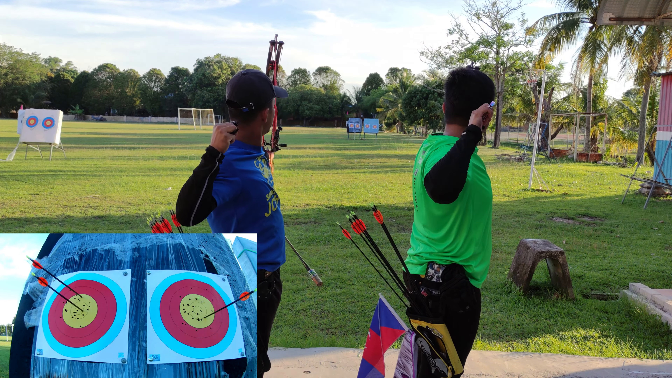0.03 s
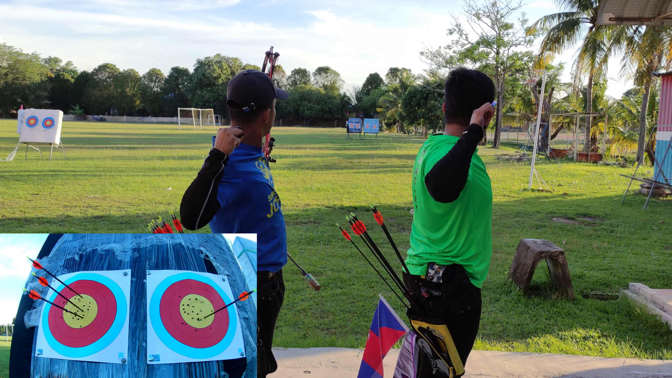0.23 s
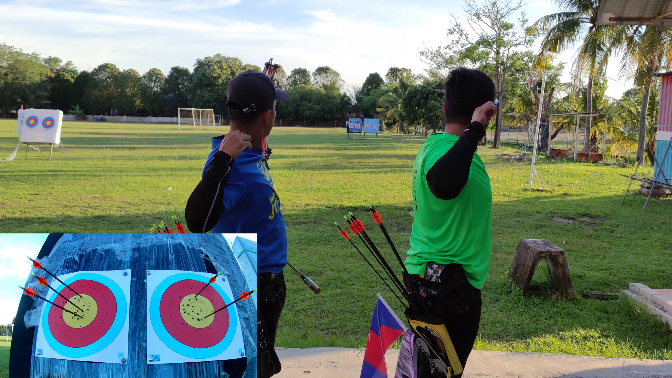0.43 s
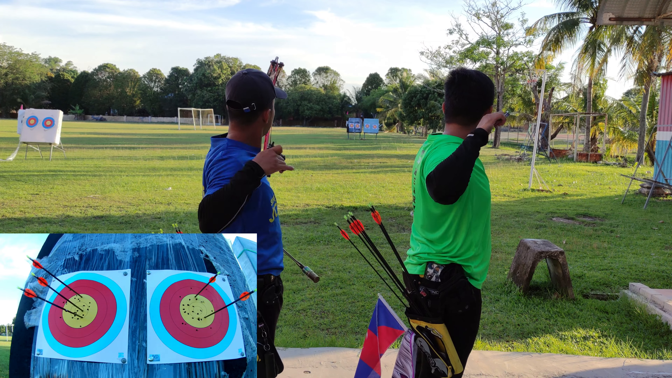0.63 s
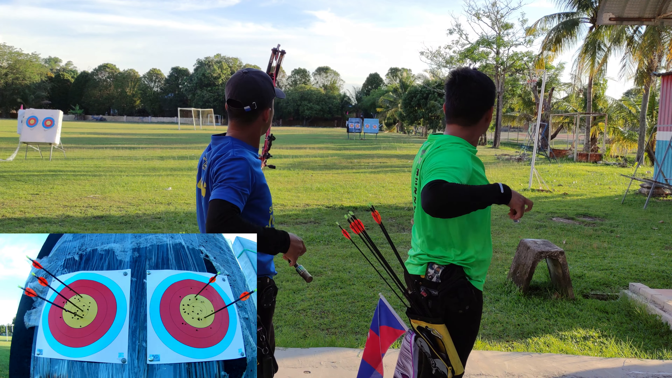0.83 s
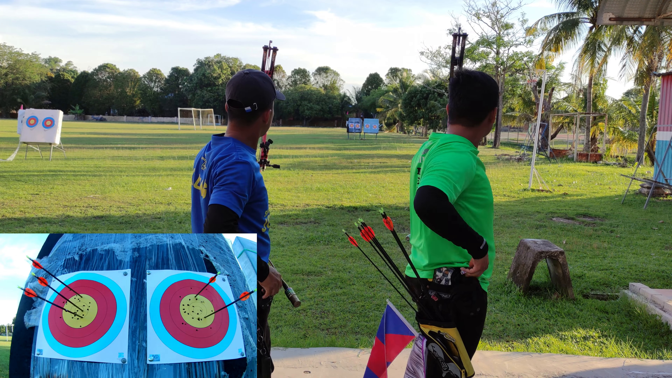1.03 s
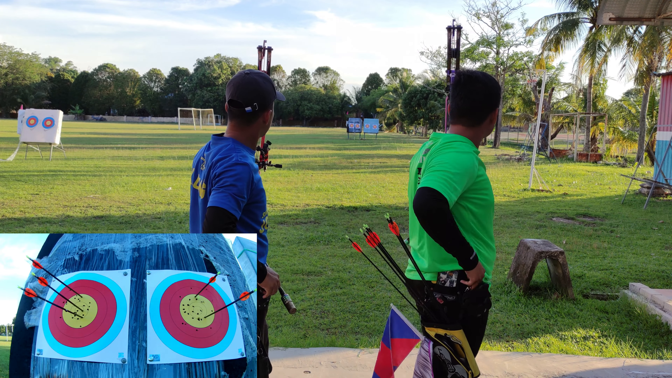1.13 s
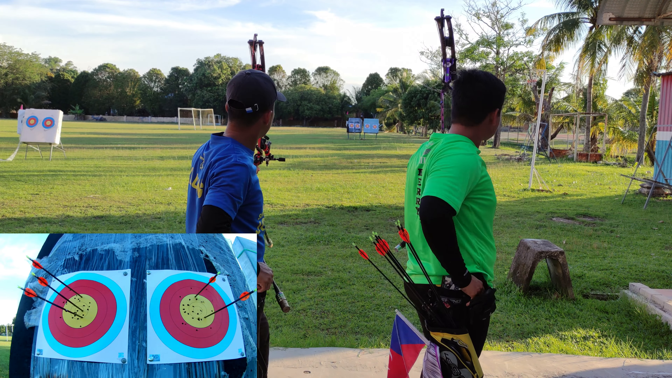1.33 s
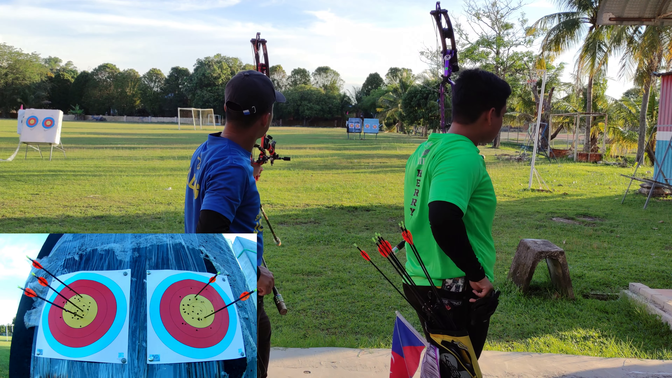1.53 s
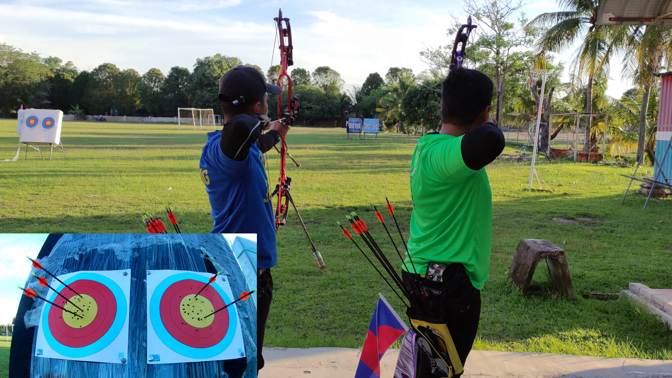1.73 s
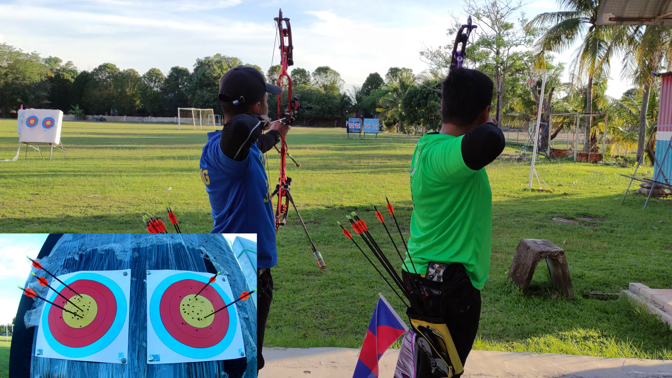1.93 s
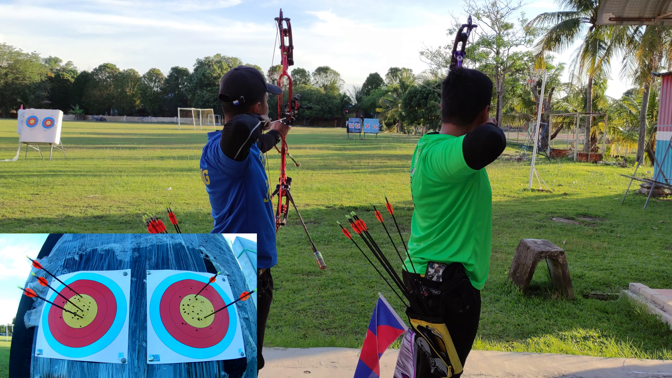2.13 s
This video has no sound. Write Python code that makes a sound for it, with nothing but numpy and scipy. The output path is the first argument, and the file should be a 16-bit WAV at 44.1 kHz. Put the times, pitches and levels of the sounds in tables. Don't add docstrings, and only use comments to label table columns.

```python
import sys
import numpy as np
from scipy import signal
from scipy.io import wavfile

SR = 44100
rng = np.random.default_rng(int(sys.argv[2]) if len(sys.argv) > 2 else 0)


def generate_wav(signal):
    frames = np.transpose(np.atleast_2d(signal))
    scaled = np.clip(frames, -1, 1) * 32767
    pcm = np.round(scaled).astype(np.int16)
    wavfile.write(sys.argv[1], SR, pcm)


def ratio_of_db(decibels):
    return 10 ** (np.asarray(decibels, float) / 20)


N = 94815


def rms_one(x):
    return x / np.sqrt(np.mean(x ** 2) + 1e-20)


def in_time(rows):
    s, value = np.transpose(rows)
    return np.interp(np.arange(N) / SR, s, value)


def at_hz(points, hz):
    f, value = np.transpose(points)
    return np.interp(np.log(hz), np.log(f), value)


def drift(rate):
    r = np.exp(-80 * np.pi * rate / SR)
    draws = rng.standard_normal(N // 40 + 2002)
    slow = signal.lfilter([1], [1, -2 * r, r * r], draws)[2000:]
    return np.interp(np.arange(N) / 40, np.arange(len(slow)), rms_one(slow))


def ring(clicks, hz, t60):
    r, w = np.exp(-np.log(1000) / (t60 * SR)), 2 * np.pi * hz / SR
    return signal.lfilter([0, np.sin(w)], [1, -2 * r * np.cos(w), r * r], clicks + 1e-18)


def band_pass(x, order, low_hz, high_hz):
    return signal.sosfilt(signal.butter(order, [low_hz, high_hz], "band", fs=SR, output="sos"), x)


def dying(s, db, t60, low_hz, high_hz):
    after = np.arange(N) / SR - s
    noise = ratio_of_db(db - 60 * np.clip(after, 0, 1) / t60) * (after > 0) * rng.standard_normal(N)
    return band_pass(noise + 1e-18, 2, low_hz, high_hz)


# (frequency [Hz], likeness [-1 to 1])
LIKENESS = [(60, 0.98), (180, 0.99), (550, 0.7), (1650, -0.19), (4970, -0.013), (15000, -0.16)]


def banded_noise(spectrum, patchy_db):
    lowest, highest = spectrum[0][0], spectrum[-1][0]
    edges = lowest * 2 ** np.arange(0, np.log2(highest / lowest) + .3, 1 / 3)
    out, together = 0, drift(3)
    white = rng.standard_normal((2, 2, N + 4000))
    for k, (low, high) in enumerate(zip(edges, np.minimum(edges[1:], .45 * SR))):
        mid, side = band_pass(white[k % 2], 2, low, high)[:, -N:]
        hz = np.sqrt(low * high)
        alike = np.clip(at_hz(LIKENESS, hz), -1, 1)
        flicker_db = patchy_db * (.3 * together + drift(10))
        stereo = np.sqrt(1 + alike) * mid + np.sqrt(1 - alike) * side * [[1], [-1]]
        out = out + ratio_of_db(at_hz(spectrum, hz) + flicker_db) * stereo
    return rms_one(out)


# (time [s], level [dB])
RUMBLE_LEVEL = [(0.0, -41.5), (.15, -44), (0.3, -40.5), (.45, -38.5), (.6, -43), (.72, -42.5), (0.85, -42),
                (1.0, -41.5), (1.15, -43.5), (1.28, -43), (1.4, -44), (1.55, -40), (1.75, -43),
                (1.85, -36.5), (1.95, -40), (2.02, -41), (2.09, -38), (2.15, -40.5)]
# (frequency [Hz], density [dB per Hz])
RUMBLE_COLOUR = [(20, -27), (45, -5.5), (62, -1), (110, -2.5), (135, -8.5), (220, -11), (300, -21),
                 (420, -26)]


def road_rumble():
    return ratio_of_db(in_time(RUMBLE_LEVEL)) * banded_noise(RUMBLE_COLOUR, patchy_db=2.0)


# (time [s], level [dB])
WASH_LEVEL = [(0.0, -50.5), (0.14, -50), (0.27, -47.5), (0.99, -49.5), (1.3, -48.5), (1.59, -49),
              (1.76, -48.5), (1.8, -53.5), (1.95, -52.5), (2.15, -53.5)]
# (frequency [Hz], density [dB per Hz])
WASH_COLOUR = [(280, -19.5), (420, -11), (800, -3), (1200, -3), (1500, -14.5), (1950, -17), (3000, -23),
               (5000, -36.5)]


def tyre_wash():
    return ratio_of_db(in_time(WASH_LEVEL) + 3.0) * banded_noise(WASH_COLOUR, patchy_db=2.0)


# (frequency [Hz], density [dB per Hz])
AIR_COLOUR = [(2500, -30), (4000, -4.5), (6500, 3.5), (8500, 3.5), (9500, -20.5), (12000, -9)]
AIR_DB, AIR_FOLLOWS = -72, 0.78


def bright_air():
    level_db = AIR_DB + AIR_FOLLOWS * (in_time(WASH_LEVEL) + 53.5)
    return ratio_of_db(level_db) * banded_noise(AIR_COLOUR, patchy_db=1.3)


# (frequency [Hz], density [dB per Hz])
HISS_COLOUR = [(3000, -1), (9000, -9), (13000, 1.5), (16400, -21)]
HISS_DB = -74.5


def microphone_hiss():
    return ratio_of_db(HISS_DB) * banded_noise(HISS_COLOUR, patchy_db=-1)


# (time [s], level [dB])
INSECT_LEVEL = [(0, -66.5), (.5, -76), (.9, -70.5), (1.2, -66), (1.5, -74.5), (1.9, -73.5), (2.15, -75)]
INSECT_HZ, INSECT_WIDTH_HZ = 8050, 800


def insects():
    b, a = signal.iirpeak(INSECT_HZ, INSECT_HZ / INSECT_WIDTH_HZ, fs=SR)
    chorus = signal.lfilter(b, a, signal.lfilter(b, a, rng.standard_normal((2, N))))
    return ratio_of_db(in_time(INSECT_LEVEL) + drift(28)) * rms_one(chorus)


# (time [s], level [dB], lowest well-driven frequency [Hz], softness cut [Hz])
SHOVES = [
    [(0.2372, 8, 1560, 7000), (0.2379, -15, 1500, 3000), (0.23905, -4.5, 1560, 2570),
     (0.2407, 4, 533, 1360), (0.2430, -8.5, 250, 850), (0.2461, -27, 860, 2140), (0.2530, -8.5, 202, 730)],
    [(0.3496, -3, 1300, 4760), (0.3503, -5.5, 800, 2140), (0.3513, -11, 900, 2600),
     (0.3521, -17.5, 800, 1950), (0.35365, -1, 324, 1435), (0.3580, -12.5, 1310, 2500),
     (0.36185, -10, 302, 1080), (0.3686, -16.5, 248, 710)],
]
DIRECTION = [
    [1, 1, 1, -1, -1, -1, 1],
    [1, -1, 1, 1, 1, 1, -1, -1],
]
# (frequency [Hz], level [dB], t60 [s])
BOARD = [
    [(70, -26.5, .05), (310, -15, 0.063), (447, -8, 0.022), (560, -14, 0.07), (920, -12, 0.018),
     (1100, -12.5, 0.027), (1310, -6, 0.015), (1560, -2.5, 0.0087), (1800, -18, .005), (2170, -16, 0.0048),
     (3090, -25, 0.0027), (4300, -21, 0.0026), (6100, -33, 0.0033), (7160, -22, 0.0032)],
    [(177, -6.5, 0.11), (280, -28, 0.07), (392, -3.5, 0.012), (543, -15, 0.046), (640, -12, 0.02),
     (814, -42, 0.0085), (957, -11, 0.029), (1340, -12, 0.02), (1543, -6, 0.012), (1060, -21.5, 0.014),
     (1910, -2.5, 0.0047), (2500, -18.5, 0.0087), (4500, -18.5, 0.0054), (5100, -17, 0.004)],
]
LOW_LOSS_DB_PER_OCT = 41
BOARD_LOW_HZ = [35, 131]
FLIP_HZ = [1950, 20000]
CRACK_DB, CRACK_T60_S, CRACK_HZ = [-38, -49], 0.0043, [14600, 13000]
FIBRE_DB, FIBRE_T60_S, FIBRE_HZ = [-39, -27], [0.08, 0.02], (1810, 4260)


def arrows():
    out = np.zeros(N)
    for k, (shoves, signs, modes) in enumerate(zip(SHOVES, DIRECTION, BOARD)):
        radiation = signal.butter(2, BOARD_LOW_HZ[k], "high", fs=SR, output="sos")
        for (s, db, low_hz, soft_hz), sign in zip(shoves, signs):
            click, at = np.zeros(8192), int(s * SR)
            click[0] = sign * ratio_of_db(db)
            softness = signal.butter(4, soft_hz, fs=SR, output="sos")
            click = signal.sosfilt(np.vstack([radiation, softness]), click)
            for hz, mode_db, t60 in modes:
                loss_db = LOW_LOSS_DB_PER_OCT * max(np.log2(low_hz / hz), 0)
                phase = np.sign(FLIP_HZ[k] - hz)
                out[at:at + 8192] += phase * ratio_of_db(mode_db - loss_db) * ring(click, hz, t60)
        strike_s = shoves[0][0]
        out += dying(strike_s, CRACK_DB[k], CRACK_T60_S, 4000, CRACK_HZ[k])
        out += dying(strike_s, FIBRE_DB[k], FIBRE_T60_S[k], *FIBRE_HZ)
    return out


# (frequency [Hz], density [dB per Hz])
TREE_COLOUR = [(150, -16), (500, -23), (1500, 13), (3000, -11), (5000, -1), (8000, -2), (10000, -33),
               (16000, -14)]
TREES_DB, TREES_WAIT_S, TREES_RISE_S, TREES_T60_S = [-41, -47], .03, 0.045, 0.4


def trees():
    t, power = np.arange(N) / SR, 0
    for shoves, db in zip(SHOVES, TREES_DB):
        after = np.clip(t - shoves[0][0] - TREES_WAIT_S, 0, None)
        swell = 1 - np.exp(-after / TREES_RISE_S)
        power = power + (ratio_of_db(db - 60 * after / TREES_T60_S) * swell) ** 2
    return np.sqrt(power) * banded_noise(TREE_COLOUR, patchy_db=1)


# (level [dB], left over right in the treble [dB])
CLAPS = [
    (-23.5, 6),
    (-31.5, 4),
]
# (frequency [Hz], level [dB], t60 [s])
CLAP_COLOUR = [
    [(1650, -0.5, 0.0045), (4600, -4.5, 0.0033), (5900, 1.5, 0.0018), (8000, -1.5, 0.0038),
     (11000, -12, .002), (14500, -19, .002), (3000, -23, 0.0024)],
    [(1740, 8.5, 0.0023), (2920, -9.5, 0.0072), (4330, 0, 0.0028), (5800, -2.5, 0.0027), (7700, -6, 0.0062),
     (12000, -29, 0.0022)],
]
CLAP_S, CLAP_LAG_S, CLAP_SCATTER_DB = [0.2938, 0.4061], .00003, -17


def claps():
    out = np.zeros((2, N))
    for s, (db, pan_db), colour in zip(CLAP_S, CLAPS, CLAP_COLOUR):
        clicks = np.zeros((2, N))
        later, sizes = rng.integers(20, 90, 6), rng.normal(size=6)
        for ch, side in enumerate((1, -1)):
            at = int((s - side * CLAP_LAG_S / 2) * SR)
            clicks[ch, at] = -ratio_of_db(db)
            clicks[ch, at + later] = ratio_of_db(db + CLAP_SCATTER_DB) * sizes
        for k, (hz, mode_db, t60) in enumerate(colour):
            lean_db = np.array([[1], [-1]]) * pan_db * min(hz / 8000, 8000 / hz) ** 4
            out += (-1) ** k * ratio_of_db(mode_db + lean_db) * ring(clicks, hz, t60)
    return out


# (time [s], level [dB], main ring [Hz], length [s], bright share [dB])
TICKS = [(0.9206, -49, 7650, 0.0063, -6), (1.1350, -34.5, 2200, 0.004, -4), (1.1376, -41.5, 8160, 0.001, 0),
         (1.139, -52.5, 2540, 0.026, 5), (1.267, -38.5, 2500, 0.004, -12), (1.37, -48, 2480, 0.0082, -17),
         (1.4000, -48, 2350, 0.0043, 0.5), (1.437, -48, 2680, 0.014, -20), (1.502, -45, 2700, .01, -6),
         (1.517, -45, 2040, 0.0048, -6), (1.579, -47, 2850, 0.021, -2), (1.594, -34.5, 2660, 0.009, -6),
         (1.604, -50, 2770, 0.013, 3), (1.622, -38.5, 2470, 0.0085, -5.5), (1.65, -44, 2450, 0.008, -4),
         (1.733, -61, 1940, 0.003, -8), (2.1400, -72, 3580, 0.014, 2)]
# (frequency [Hz], level [dB], t60 [s])
SHAFT = [(2820, -1, 0.0081), (3880, -8.5, 0.013), (5140, -7.5, 0.0088), (6440, -10, 0.0064),
         (8100, -2, 0.0041), (14500, -20, 0.003), (7700, -12, 0.0053)]
# (frequency [Hz], level [dB], t60 [s])
LOOSE_SHAFTS = [(1710, -4, 0.0055), (2080, -5.5, 0.0066), (3160, -0.5, 0.0056), (3860, -4, 0.0054),
                (4740, -7, 0.0036), (5840, -13, 0.0024), (7920, -9.5, 0.0031)]
LOOSE_FROM_S, TICK_T60_S = 1.33, .008
FIRST_CLICK, TICK_CLICKS_PER_S, TICK_SPREAD = 4, 9000, .5
TICK_TAIL_DB, TICK_TAIL_T60_S, TICK_GRIT_DB = -18, .15, -34


def quiver():
    out, span = np.zeros((2, N + 8192)), np.arange(8192) / SR
    for s, db, hz, length, bright_db in TICKS:
        mid, side = rng.standard_normal((2, 8192))
        touching = rng.random(8192) < TICK_CLICKS_PER_S / SR
        shape = np.where(span < length, 1, ratio_of_db(TICK_TAIL_DB - 60 * span / TICK_TAIL_T60_S))
        burst = touching * shape * np.array([mid + TICK_SPREAD * side, mid - TICK_SPREAD * side])
        burst[:, 0] = FIRST_CLICK
        at = int(s * SR)
        out[:, at:at + 8192] += ratio_of_db(db + bright_db + TICK_GRIT_DB) * burst
        shared = SHAFT if s < LOOSE_FROM_S else LOOSE_SHAFTS
        for f, mode_db, t60 in [(hz, -bright_db, TICK_T60_S)] + list(shared):
            body = ring(ring(burst, f, t60), f, t60 / 4)
            out[:, at:at + 8192] += ratio_of_db(db + bright_db + mode_db) * body / np.abs(body).max()
    return band_pass(out[:, :N], 4, 1400, 16000)


def scene():
    field = road_rumble() + tyre_wash() + bright_air() + microphone_hiss() + insects()
    return field + arrows() + trees() + claps() + quiver()


def band_limit(x):
    return signal.sosfilt(signal.butter(12, 16490, fs=SR, output="sos"), x)


def record(dry):
    top, cutoff_hz = 1.05, 16200
    rounded = np.clip(top * np.tanh(dry / top), -1, 1)
    top_cut = signal.cheby2(12, 60, cutoff_hz + 700, fs=SR, output="sos")
    mix = signal.sosfilt(top_cut, rounded)
    return band_limit(mix)


dry = scene()
out = record(dry)
generate_wav(out)
```